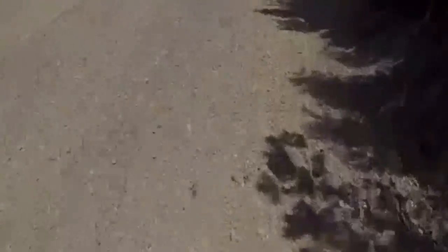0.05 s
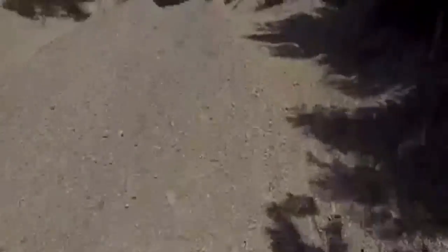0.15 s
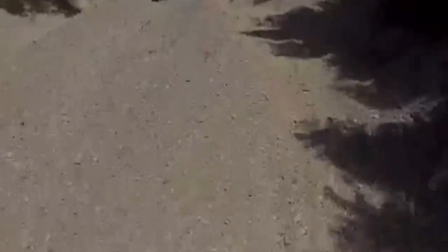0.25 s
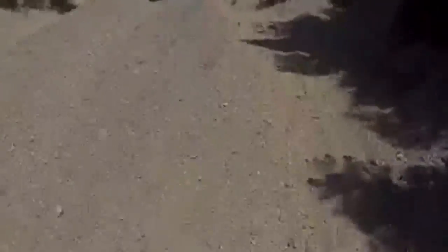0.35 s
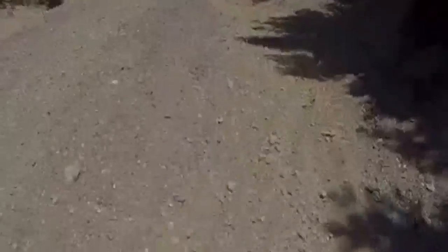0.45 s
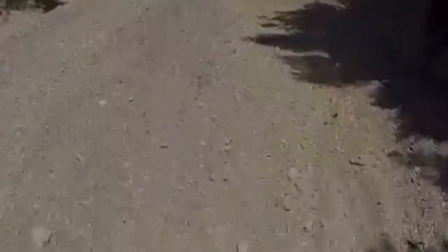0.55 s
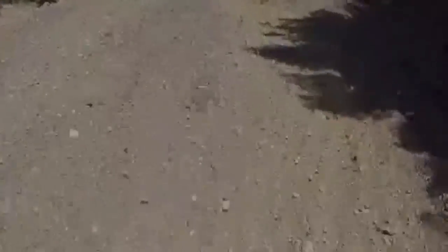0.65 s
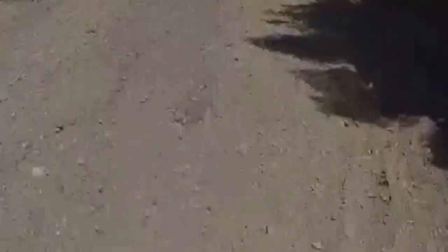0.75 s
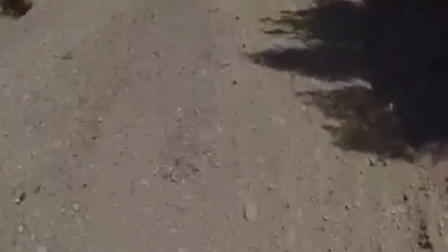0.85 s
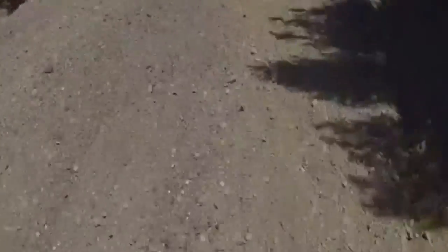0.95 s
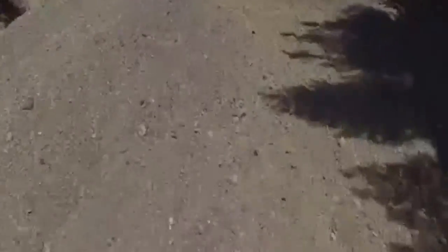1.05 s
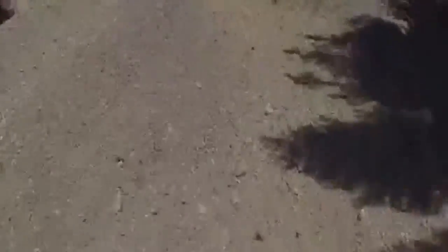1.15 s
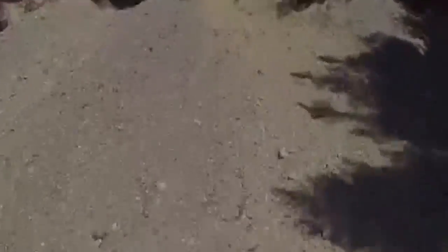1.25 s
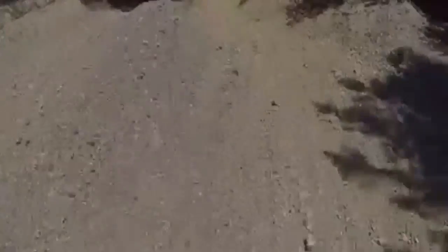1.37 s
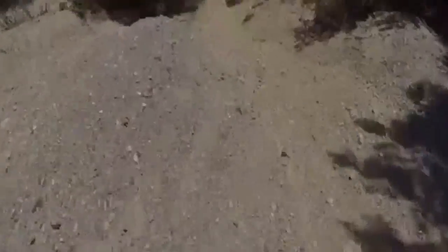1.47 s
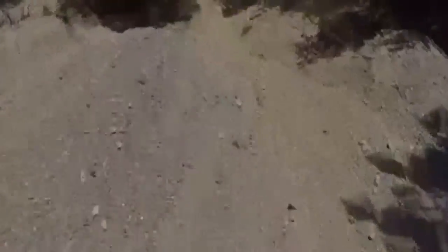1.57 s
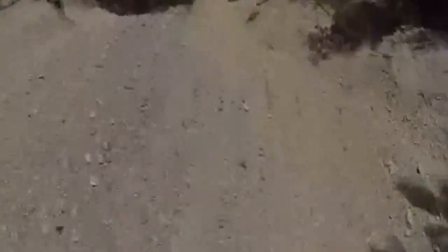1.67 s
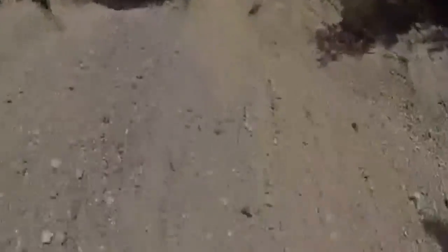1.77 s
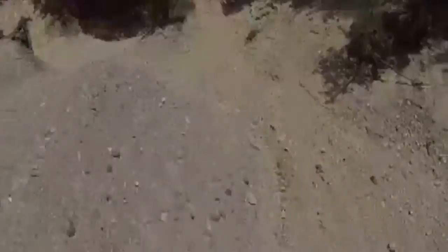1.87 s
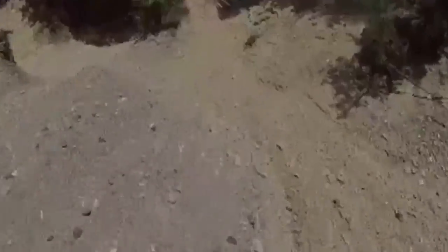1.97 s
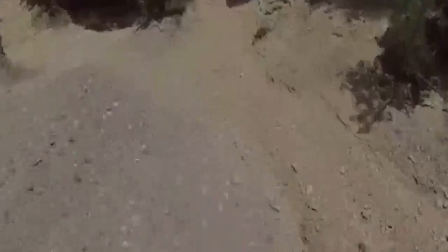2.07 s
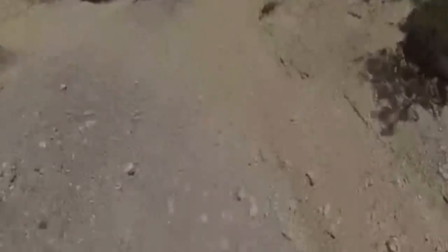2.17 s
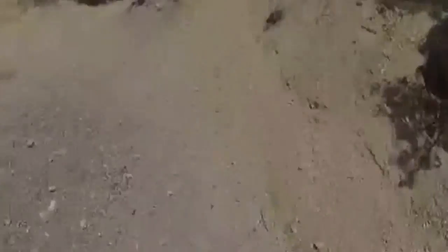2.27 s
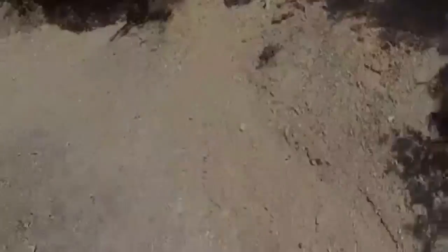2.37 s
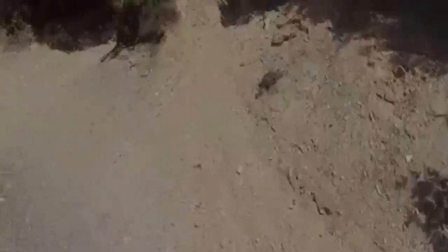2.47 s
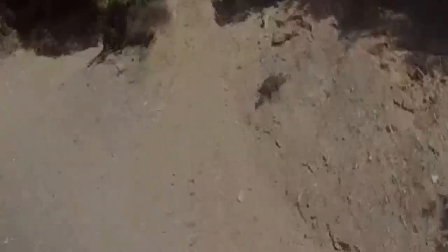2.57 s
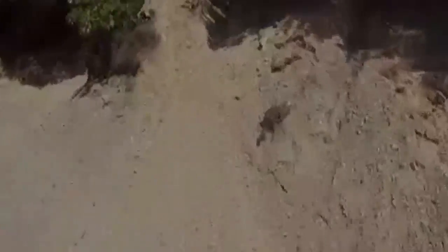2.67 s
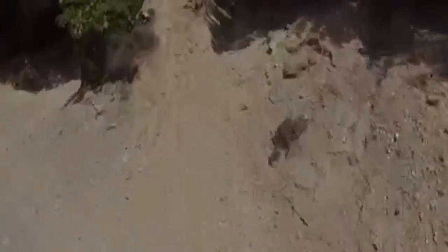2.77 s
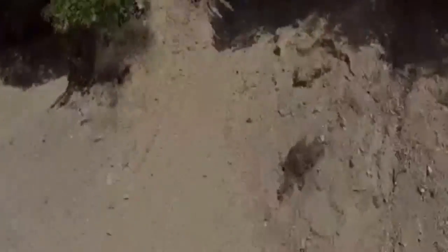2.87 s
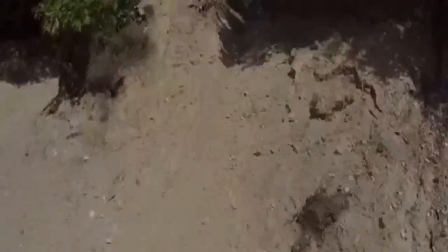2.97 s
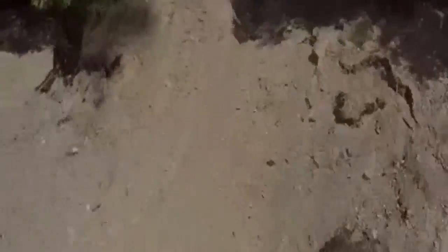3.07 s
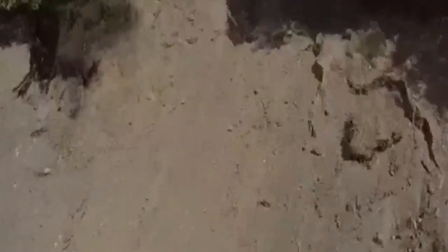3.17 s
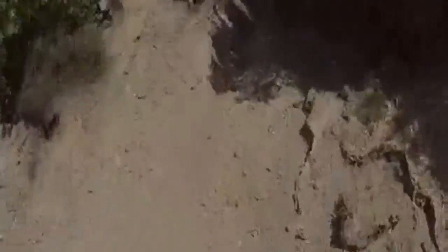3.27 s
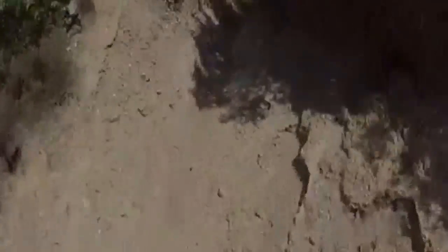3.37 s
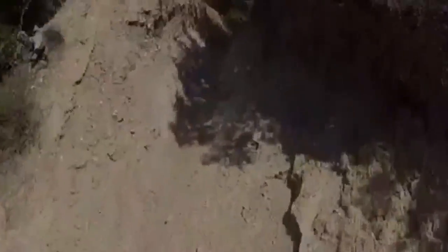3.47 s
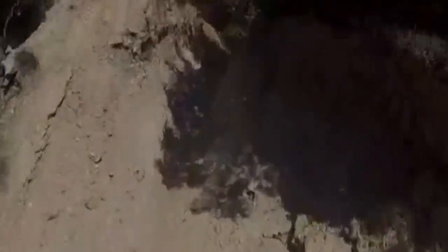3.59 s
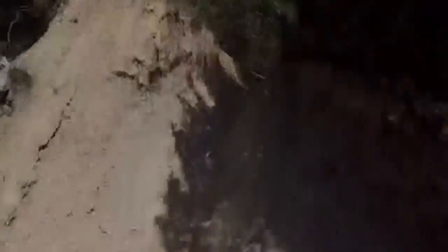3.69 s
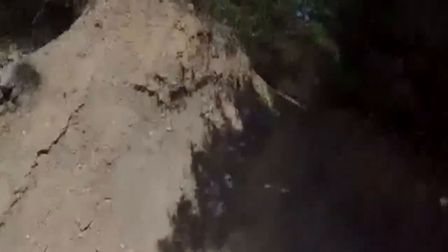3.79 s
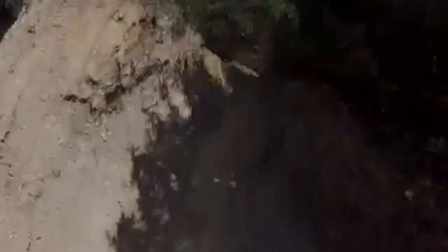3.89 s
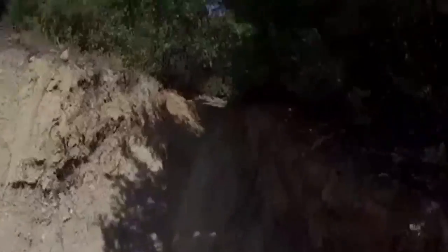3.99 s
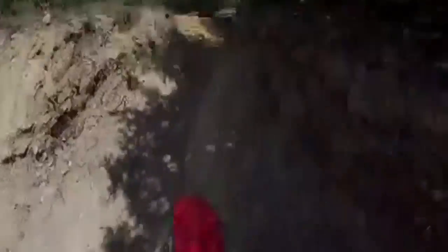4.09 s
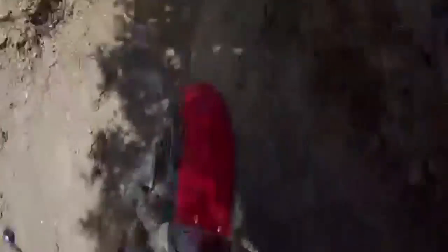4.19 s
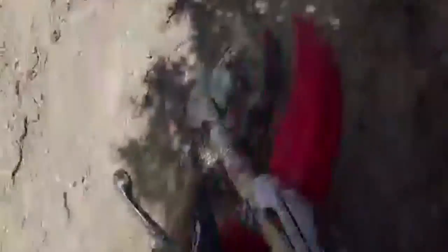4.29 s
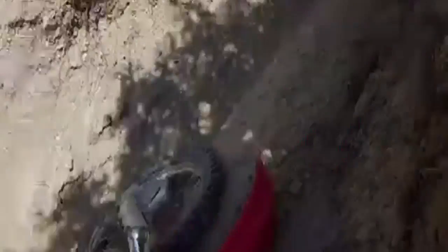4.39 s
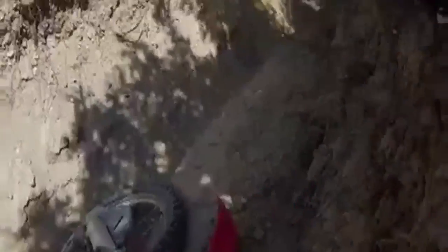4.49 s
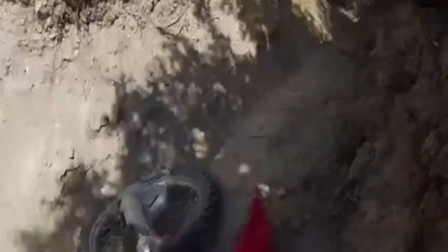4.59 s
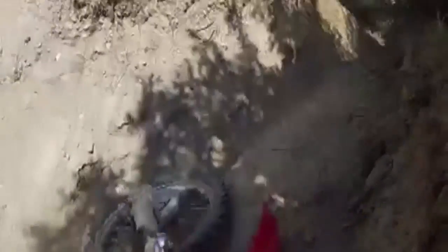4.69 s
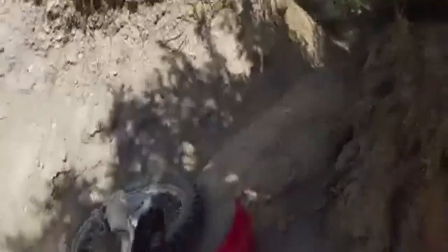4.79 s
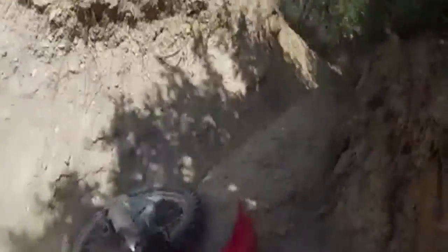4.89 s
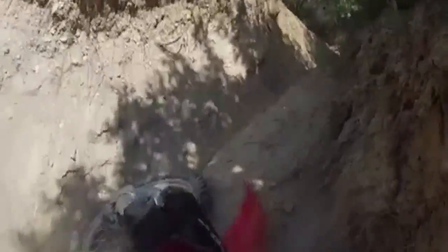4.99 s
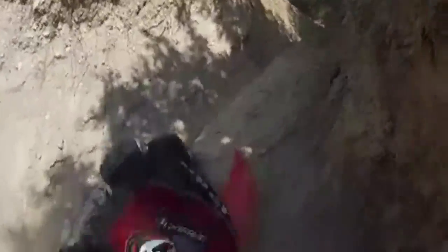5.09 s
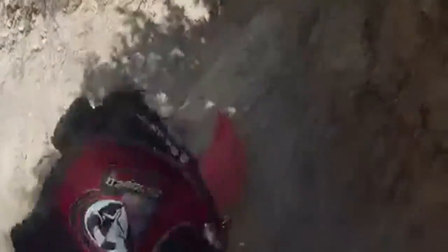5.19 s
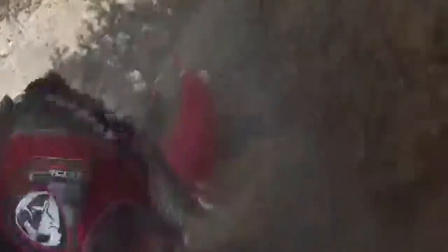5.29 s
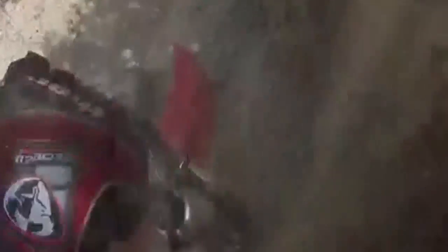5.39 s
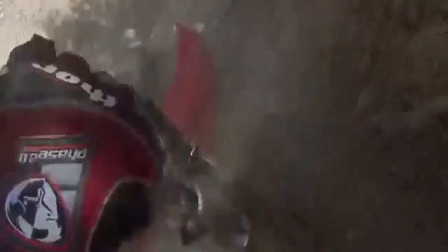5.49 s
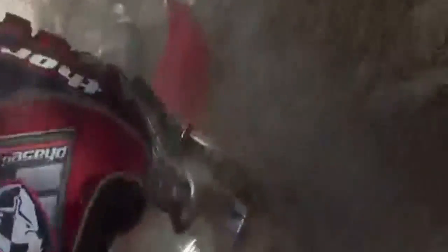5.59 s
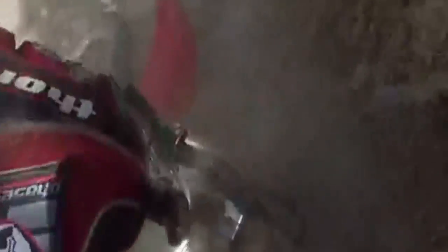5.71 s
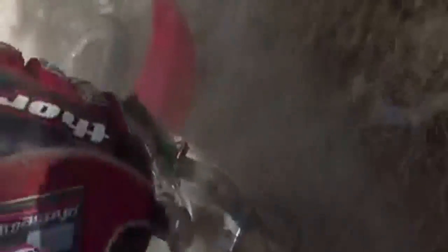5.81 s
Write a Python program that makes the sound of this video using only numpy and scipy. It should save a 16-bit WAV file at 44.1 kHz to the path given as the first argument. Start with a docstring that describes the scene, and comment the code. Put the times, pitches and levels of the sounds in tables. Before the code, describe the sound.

A rider-mounted microphone in a plastic case catches a harsh, ringing dirt bike engine surging unevenly over faint tyre crunch and low buffeting. After about three seconds the revs collapse into a noisy putter and die. Very loud low blows, crunching stones and short soil scrapes burst out, then thin away to quiet outdoor air.

```python
"""A two-stroke dirt bike climbs a gravel track, heard from a cased camera on the rider.
The throttle opens and closes: firing pulses feed a pipe note, a ringing case, a noisy rasp and a whine.
The engine drops to a noisy burble and dies away as the bike falls against a dirt bank with deep sine thuds.
It slides through the soil in swelling scrapes of random grit, and stones tick as short noise bursts.
Tyre crunch, low buffeting and a faint hiss, all filtered noise, lie underneath."""
import sys
import numpy as np
from scipy import signal
from scipy.fft import rfft, irfft, next_fast_len
from scipy.io import wavfile
from scipy.ndimage import uniform_filter1d, map_coordinates

SR = 44100
rng = np.random.default_rng(int(sys.argv[2]) if len(sys.argv) > 2 else 0)


def store_pcm(level_fs):
    """Save levels as 16-bit WAV."""
    pcm = np.round(np.clip(level_fs, -1, 1) * 32767).astype(np.int16)
    wavfile.write(sys.argv[1], SR, np.atleast_2d(pcm).T)


N = 257984

# spectrum of disturbed soil and stones, shared by clacks and scrapes: pitch_hz [Hz], density_db [dB per Hz]
SOIL_COLOUR = [(330, 1.5), (900, -17), (1450, 5.5), (2450, 5), (3400, -2.5), (7500, -18.5), (14000, -48)]


def amp(db):
    """Decibels to linear gain."""
    return 10 ** (np.asarray(db) / 20)


def unit(x):
    """x scaled to rms 1 overall."""
    return x / np.sqrt(np.mean(x ** 2) + 1e-20)


def steady(x):
    """x held at rms 1 from moment to moment."""
    return x / np.sqrt(np.abs(uniform_filter1d(x * x, size=2200)) + 1e-12)


def curves(rows):
    """One value per sample for each column after the time."""
    s, *cols = np.transpose(rows)
    return [np.interp(np.arange(N) / SR, s, c) for c in cols]


def wobble(rate):
    """A smooth random curve, rate knots a second."""
    knots = rng.standard_normal(int(N * rate / SR) + 4)
    return map_coordinates(knots, [np.arange(N) * rate / SR])


def filtered(x, response):
    """x times a complex response of frequency."""
    m = 2 * next_fast_len(N // 2 + SR // 4)
    return irfft(rfft(x, m) * response(np.fft.rfftfreq(m, 1 / SR)), m)[:N]


def coloured(x, points):
    """x through a causal (minimum-phase) filter with the given (Hz, dB) points."""
    f, db = np.transpose(points)

    def response(hz):
        log_gain = np.log(amp(np.interp(np.log(hz + 1), np.log(f), db)))
        cepstrum = irfft(log_gain)
        half = len(cepstrum) // 2
        # folding the cepstrum forward in time makes the filter causal
        cepstrum[1:half] *= 2
        cepstrum[half + 1:] = 0
        return np.exp(rfft(cepstrum))
    return filtered(x, response)


def pulses(at, sizes):
    """Clicks at fractional sample positions, each a windowed sinc."""
    taps = np.floor(at)[:, None] + np.arange(-7, 9)
    offset = taps - at[:, None]
    shape = np.sinc(offset) * np.cos(np.pi * offset / 16) ** 2
    places = np.clip(taps, 0, N).astype(int).ravel()
    return np.bincount(places, (shape * sizes[:, None]).ravel(), N + 1)[:N]


def add(track, s, sound):
    """Mix a sound into a track at time s."""
    room = track[round(s * SR):][:len(sound)]
    room += sound[:len(room)]


def smeared(x, spread_s, knot_hz):
    """x arriving by many paths: each frequency comes with its own delay."""
    def response(hz):
        knots = np.arange(0, SR, knot_hz)
        delay_s = np.interp(hz, knots, spread_s * rng.random(len(knots)))
        return np.exp(-2j * np.pi * np.cumsum(delay_s) * hz[1])
    return filtered(x, response)


def blend(clean, rough, share):
    """Two sounds mixed by power, share being the rough part."""
    return np.sqrt(1 - share) * steady(clean) + np.sqrt(share) * steady(rough)


def dulled(x, corner_hz):
    """x with its treble rolled off."""
    return filtered(x, lambda hz: 1 / np.hypot(1, (hz / corner_hz) ** 2))


def ribbed(x, depth_db, spacing_hz):
    """x through the many narrow, close resonances of panels and shell, as random ripples in level."""
    knots = np.arange(0, SR, spacing_hz)

    def response(hz):
        return amp(np.interp(hz, knots, depth_db * rng.standard_normal(len(knots))))
    return filtered(x, response)


def resonance(f, centre_hz, width_hz):
    """Response of one damped resonance, with gain 1 at its centre."""
    return 1j * f * width_hz / (centre_hz * centre_hz - f * f + 1j * f * width_hz)


def resonating(x, modes):
    """x ringing in (Hz, width Hz, dB) resonances of alternating polarity."""
    def response(f):
        return sum((-1) ** k * amp(db) * resonance(f, centre_hz, width_hz)
                   for k, (centre_hz, width_hz, db) in enumerate(modes))
    return filtered(x, response)


def tone(x, hz):
    """x passed twice through one resonance 55 Hz wide, which singles out a narrow band."""
    mode = [(hz, 55, 0)]
    return resonating(resonating(x, mode), mode)


def shelled(x, width_hz=45):
    """x with the shell's narrow resonances ringing on top."""
    # narrow ribs of the shell that stand out of the rasp: pitch_hz [Hz], level_db [dB]
    shell_modes = [(2582, -3), (2936, -2.5), (3390, 6), (4077, -26), (6046, 5.5), (7163, 6.5)]

    def response(f):
        return 1 + sum(amp(db) * resonance(f, centre_hz, width_hz) for centre_hz, db in shell_modes)
    return filtered(x, response)


def shifting(x, depth_db=2.5):
    """The microphone moves with the rider, so single partials swell and fade."""
    z = signal.stft(x, nperseg=2048)[2]
    field = uniform_filter1d(rng.standard_normal(z.shape), size=6, axis=0)  # across pitch
    field = uniform_filter1d(field, size=8, axis=1)  # across time
    return signal.istft(z * amp(depth_db * unit(field)))[1][:N]


def grit(per_second, spread_db):
    """Countless tiny contacts of uneven size."""
    hits = rng.random(N) < per_second / SR
    return unit(hits * rng.standard_normal(N) * amp(spread_db * rng.standard_normal(N)))


def stalling(fade_s, stall_s=3.94):
    """Full gain until the engine stalls, then a straight fade to silence."""
    return np.clip(1 - (np.arange(N) / SR - stall_s) / fade_s, 0, 1)


def exhaust_note(at, size_db, noise_share, speed, coasting, mellow_hz=600):
    """Firing pulses ring the pipe; with the throttle shut they smear into a burble."""
    # spectrum of the pipe with the throttle open: pitch_hz [Hz], level_db [dB]
    pipe = [(50, -0.5), (125, 0), (180, 4.5), (255, 9.5), (320, 1), (400, -9), (510, 1.5), (660, -12),
            (790, 5.5), (950, -11), (2000, -33)]
    # spectrum of the pipe with the throttle shut: pitch_hz [Hz], level_db [dB]
    burble_colour = [(45, -68), (100, -18), (190, -3), (245, 7), (305, 9), (385, -9.5), (560, 4.5),
                     (690, -12.5), (810, -5), (950, -15), (2200, -53)]
    # firing rates between which the note loses its upper partials: start and end [firings per second]
    high_revs_hz = [134, 172]
    firings = blend(pulses(at, amp(size_db)), rng.standard_normal(N), noise_share)
    burble = coloured(smeared(firings, .025, 90), burble_colour)
    note = shifting(blend(coloured(firings, pipe), burble, coasting))
    return blend(note, dulled(note, mellow_hz), np.interp(speed, high_revs_hz, [0, 1]))


def case_ring(drive, sing_hz=1513):
    """The bangs ring the camera case, which at set moments sings almost as a pure tone."""
    # camera case resonances: pitch_hz [Hz], width_hz [Hz], level_db [dB]
    case_modes = [(1275, 84.5, 0), (1519, 93, 6.5), (1669, 91, 0.5), (1744, 62, 0.5)]
    # how far the ring narrows to one tone: time_s [s], tone_share [0 to 1, of power]
    singing_points = [(.41, .78), (.47, .04), (1.1, .04), (1.5, .35), (1.9, .05)]
    singing, = curves(singing_points)
    return blend(shifting(resonating(drive, case_modes), depth_db=4.0), tone(drive, sing_hz), singing)


def gas_rasp(drive, coasting, dull_hz=5800):
    """Each firing blows down in a puff of rasping gas that rings the shell, duller with the throttle shut."""
    # blow-down rasp spectrum: pitch_hz [Hz], density_db [dB per Hz]
    rasp_colour = [(150, -17.5), (1050, -6), (1500, 0.5), (2000, -9), (2450, 4.5), (3100, -5.5), (4200, -2),
                   (5300, -5.5), (7200, -7), (8200, -10), (14500, -23)]
    rasp = coloured(shelled(ribbed(drive, 1.2, 55)), rasp_colour)
    return shifting(blend(rasp, dulled(rasp, dull_hz), coasting))


def engine(whine_hz=4090, overrun_hz_per_s=750, last_firings_s=.06, run_out_s=.6):
    """Each firing sends a pulse down the pipe, a sharp bang into the case and a puff of rasping gas."""
    # crank speed: time_s [s], firing_rate [firings per second]
    speed_points = [(0.05, 156.8), (0.13, 137.6), (0.28, 133.6), (0.39, 139.0), (0.48, 126.0),
                    (0.55, 132.0), (0.62, 121.2), (0.69, 126.6), (0.8, 122.3), (0.89, 137.2), (0.98, 129.6),
                    (1.03, 144.1), (1.09, 131.1), (1.13, 143.7), (1.26, 146.0), (1.37, 157), (1.48, 139),
                    (1.7, 178.9), (1.76, 168.5), (1.86, 115.7), (1.93, 115.6), (2.16, 142.2), (2.22, 133.5),
                    (2.42, 135.5), (2.53, 144), (2.69, 183.1), (2.75, 184.4), (2.81, 146.0), (2.96, 115.0),
                    (3.02, 89), (3.08, 93), (3.23, 80), (3.31, 86), (3.36, 77.5), (3.48, 71.5),
                    (3.53, 62.5), (3.65, 65), (3.74, 61), (3.94, 67)]
    # the three voices as the throttle works: time_s [s], exhaust_note_db, metallic_ring_db, rasp_db [dB]
    voice_levels = [(0.07, -30.5, -26, -24), (0.13, -25.5, -16.5, -21), (0.41, -27.5, -18.5, -22.5),
                    (0.5, -21.5, -25, -29.5), (0.56, -20, -17.5, -24), (0.6, -23.5, -26.5, -26),
                    (0.82, -23.5, -24.5, -29.5), (0.93, -22, -20.5, -24), (1.32, -26, -18, -20),
                    (1.39, -35, -32.5, -26), (1.46, -28.5, -18.5, -25.5), (1.56, -22, -20, -20.5),
                    (1.72, -28, -19, -22), (1.83, -40, -29.5, -35), (1.89, -24, -25, -29),
                    (2.02, -22, -26.5, -31.5), (2.11, -25, -19, -24.5), (2.54, -32, -25.5, -25),
                    (2.7, -26, -18.5, -18.5), (2.81, -36, -29, -30.5), (2.86, -25.5, -13.5, -20),
                    (2.9, -21.5, -25, -25), (2.96, -19.5, -22, -24), (3.02, -32.5, -34, -36),
                    (3.98, -38, -36, -41), (4.2, -59, -44.5, -44)]
    # firing rates between which the throttle goes from shut to open: shut, open [firings per second]
    coasting_hz = [87.7, 117.96]
    # a whine that grows with the revs: firing_rate [firings per second], level_db [dB over the rasp]
    whine_levels = [(140, -20), (168, -7.5)]
    # power share of noise in each voice: (throttle open, throttle shut)
    note_shares, ring_shares, rasp_shares = (.005, .025), (.08, .7), (.55, .9)

    speed, = curves(speed_points)
    note_db, ring_db, rasp_db = curves(voice_levels)
    coasting = np.interp(speed, coasting_hz, [1, 0])
    # when the revs drop suddenly the firing breaks up into noise
    overrun = np.clip(-np.gradient(speed) * SR / overrun_hz_per_s, 0, 1) ** 3
    note_noise, ring_noise, rasp_noise = [np.maximum(overrun, pulling + (shut - pulling) * coasting)
                                          for pulling, shut in (note_shares, ring_shares, rasp_shares)]

    # firing times drift a little, more so when coasting
    drift = (.002 + .007 * coasting) * wobble(30)
    turns = np.cumsum(speed * (1 + drift)) / SR
    count = int(turns[-1]) + 1
    at = np.interp(np.arange(count), turns, np.arange(N))
    # no two charges burn alike, least of all with the throttle shut
    timing, bang_chance, note_chance = rng.standard_normal((count, 3)).T
    uneven_db = .8 + .7 * coasting[at.astype(int)]
    at = at + .000022 * SR * timing  # 22 microseconds of jitter

    note = exhaust_note(at, uneven_db * note_chance, note_noise, speed, coasting)
    # under load the bangs dominate the ring; coasting leaves mostly loose mechanical clatter
    bangs = smeared(pulses(at, amp(1.8 * bang_chance)), .007, 170)
    puff = 1 + np.exp(-(turns % 1) * 2)  # strongest at each firing
    rasp = gas_rasp(blend(bangs, puff * rng.standard_normal(N), rasp_noise), coasting)
    ring = case_ring(blend(bangs, puff * rng.standard_normal(N), ring_noise))
    whine_db = np.interp(speed, *np.transpose(whine_levels))

    rasp_and_whine = steady(rasp) + amp(whine_db) * steady(tone(bangs, whine_hz))
    sound = amp(note_db) * stalling(last_firings_s) * steady(note)
    sound += amp(ring_db) * steady(ring)
    sound += amp(rasp_db + 1.13 * wobble(25.745)) * rasp_and_whine  # the rasp flickers in level
    return sound * stalling(run_out_s)


def thuds(rest_hz=92, squeeze_hz=20, relax_s=0.015, tail_db=-16, tail_t60=0.75, attack_s=0.0022,
          shudder_db=-13):
    """A blow booms low, a little sharper while the contact is pressed, knocks the frame and shakes loose parts."""
    # heavy blows, levels before the layer trims: start_s [s], thud_db [dB], thud_t60 [s], knock_db [dB]
    blows = [(3.169, -26, 0.067, -36), (3.48, -34, 0.093, -41), (3.677, -24, 0.066, -22.5),
             (4.054, -27, 0.35, -27.5), (4.224, -29, 0.076, -37), (4.419, -0.5, 0.042, -37),
             (4.466, -12, 0.23, -24.5), (4.55, -4, 0.037, -7), (4.585, -11.5, 0.13, -20),
             (4.876, -13, 0.14, -12.5), (4.916, -19, 0.098, -19.5), (4.964, -19, 0.024, -18.5),
             (4.982, -18, 0.22, -20), (5.144, -38, 0.21, -29.5), (5.421, -30.5, 0.09, -35)]
    # what the frame knocks with: pitch_hz [Hz], level_db [dB], t60 [s]
    frame_modes = [(149, -6, 0.51), (251, 5, 0.1), (298.5, 4, 0.16), (406, -16.5, 0.26), (670, -9.5, 0.088),
                   (754, -12.5, 0.078)]
    out, shake, t = np.zeros(N), np.zeros(N), np.arange(SR * 3 // 4) / SR
    # the pitch starts squeeze_hz above rest and relaxes
    swing = np.sin(2 * np.pi * (rest_hz * t + squeeze_hz * relax_s * (1 - np.exp(-t / relax_s))))
    rise = 1 - np.exp(-t / attack_s)
    knock = sum(amp(level - 60 * t / life) * np.sin(2 * np.pi * hz * t) for hz, level, life in frame_modes)
    for s, db, t60, knock_db in blows:
        # short thuds get less of the long tail
        tail = amp(tail_db - 60 * t / tail_t60) * min(t60 / 0.13, 1) ** 2
        boom = swing * (amp(-60 * t / t60) + tail)
        add(out, s, (amp(db + 5.5) * boom + amp(knock_db - 8.0) * knock) * rise)
        add(shake, s, amp(db + shudder_db - 60 * t / t60) * rise)
    shudder = coloured(rng.standard_normal(N), [(50, -15), (150, 6.0), (900, -25.5), (3000, -82)])
    return out + shake * steady(shudder)


def slide():
    """Soil and gravel scrape along the bike in uneven clumps; each scrape swells and fades."""
    # scrapes, swell and fade timed over 20 dB: peak_s [s], level_db [dB], swell_s [s], fade_s [s]
    scrapes = [(4.26, -41.5, 0.43, 0.25), (4.404, -29.5, 0.02, 0.014), (4.527, -30.5, 0.028, 0.11),
               (4.874, -22, 0.15, 0.042), (4.95, -38.5, 0.099, 0.25)]
    t = np.arange(N) / SR
    pressure = sum(amp(db - 20 * np.maximum((s - t) / swell, (t - s) / fade)) for s, db, swell, fade in scrapes)
    stones = grit(per_second=7000, spread_db=3.1) * amp(2.8 * wobble(90))
    return pressure * unit(coloured(stones, SOIL_COLOUR))


def clacks():
    """Stones and hard parts strike: a dull crunch and a bright spray of noise, both dying fast."""
    # strikes before the layer trims: start_s [s], level_db [dB], treble_db [dB, spray over crunch], t60 [s]
    strikes = [(3.788, -25, -22, 0.031), (4.379, -21, 31, 0.13), (4.42, -15, -14, 0.028),
               (4.464, -25.5, -30, 0.2), (4.518, -24, -20, 0.045), (4.752, -20.5, -32, 0.03),
               (4.824, -26, -28, 0.046), (4.873, -16, -25, 0.05), (4.997, -17, -30, 0.046),
               (5.074, -36, -11, 0.048), (5.189, -22, -12, 0.04), (5.298, -37.5, -12, 0.082),
               (5.377, -33, -6, 0.097), (5.422, -38.5, -15, 0.3), (5.492, -35, 20, 0.054)]
    dull, bright, t = np.zeros(N), np.zeros(N), np.arange(SR // 4) / SR
    for s, db, treble_db, t60 in strikes:
        # crunch and spray share the strike's power
        fall = amp(db - 60 * t / t60) / np.hypot(1, amp(treble_db))
        add(dull, s, fall)
        add(bright, s, fall * amp(treble_db))
    crunch = coloured(dull * rng.standard_normal(N), SOIL_COLOUR)
    spray = coloured(bright * rng.standard_normal(N), [(800, -6), (2500, -0.5), (6500, 3.5), (14000, -16.0)])
    return amp(-0.5) * crunch + amp(-2.5) * spray


def tyres(roll_db=-46.5, stop_s=4.6, braking_s=0.89):
    """Knobbly tyres crunch over the dirt as dense grit, fading out until the wheels stop."""
    # spectrum of tyres on dirt: pitch_hz [Hz], density_db [dB per Hz]
    tread_colour = [(150, -19), (900, 18), (6000, -32)]
    rolling = np.clip((stop_s - np.arange(N) / SR) / braking_s, 0, 1)
    crunch = grit(per_second=6000, spread_db=2) * amp(2 * wobble(40))
    return amp(roll_db) * rolling * unit(coloured(crunch, tread_colour))


def buffet(gust_hz=12):
    """Low rumble of air and jolts on the case: dark noise with a wandering level."""
    # air and jolts, mean level: time_s [s], level_db [dB]
    buffet_levels = [(0, -34), (.6, -34), (2.8, -40), (3.05, -31.5), (3.5, -33.5), (4.9, -31), (5.2, -42.5),
                     (5.85, -50)]
    # rumble spectrum: pitch_hz [Hz], density_db [dB per Hz]
    rumble_colour = [(28, 7.5), (55, -12.5), (110, -0.5), (250, -26.5), (1500, -80)]
    level_db, = curves(buffet_levels)
    jolts_db = 3.5 * wobble(gust_hz)
    return amp(level_db + jolts_db) * unit(coloured(rng.standard_normal(N), rumble_colour))


def hiss():
    """Faint steady air with a sprinkle of falling dust."""
    dust = grit(per_second=160, spread_db=1)
    air = rng.standard_normal(N) + 0.73 * dust
    return amp(-58.0) * unit(coloured(air, [(200, 1.5), (6000, -4.5), (14000, -22.0)]))


def scene():
    """All layers summed, the same in both channels."""
    mono = engine() + thuds() + slide() + clacks() + tyres() + buffet() + hiss()
    return np.array([mono, mono])


def record(dry, top_hz=14300):
    """The camera rounds off the highest peaks and keeps nothing above its band, little below 10 Hz."""
    rounded = dry / (1 + np.abs(dry / .93) ** 10) ** (1 / 10)
    return np.array([filtered(side, lambda hz: (hz < top_hz) * hz / (hz - 10j)) for side in rounded])


dry = scene()
out = record(dry)
store_pcm(out)
```